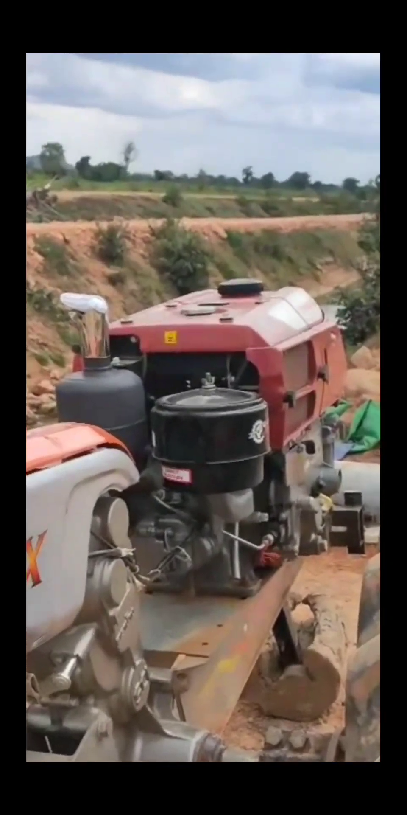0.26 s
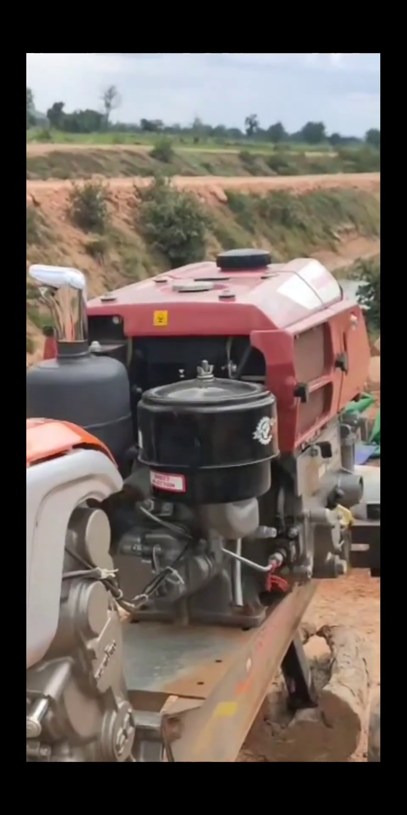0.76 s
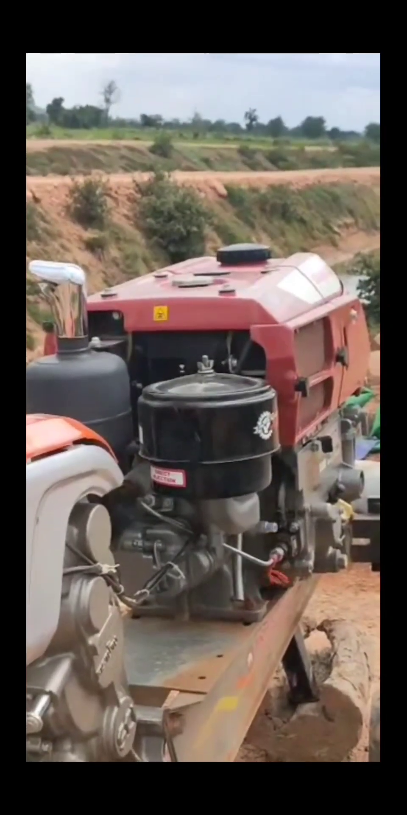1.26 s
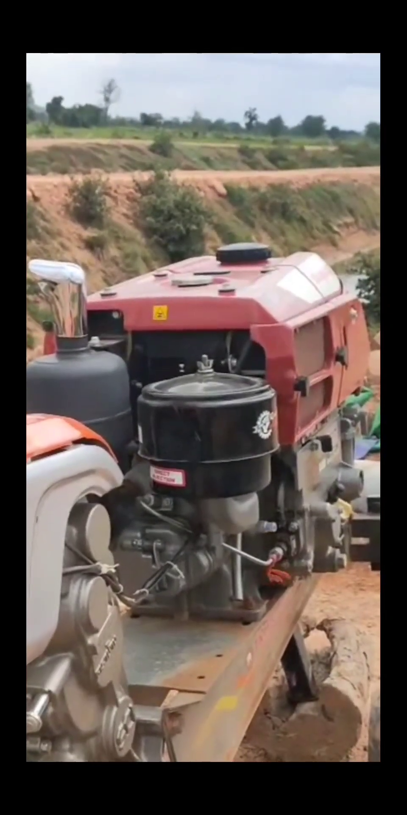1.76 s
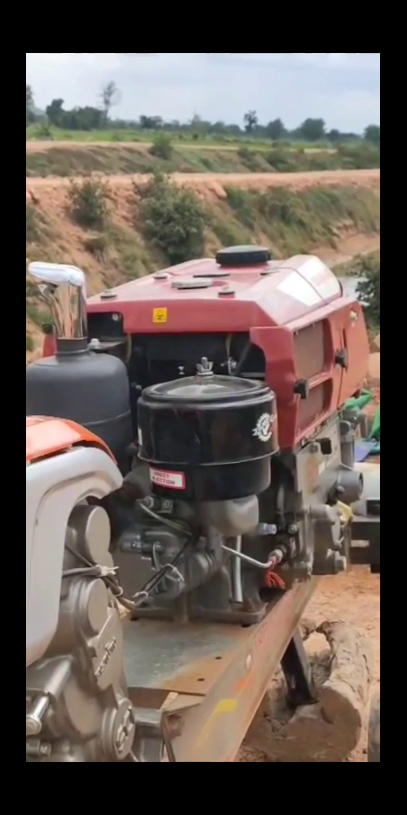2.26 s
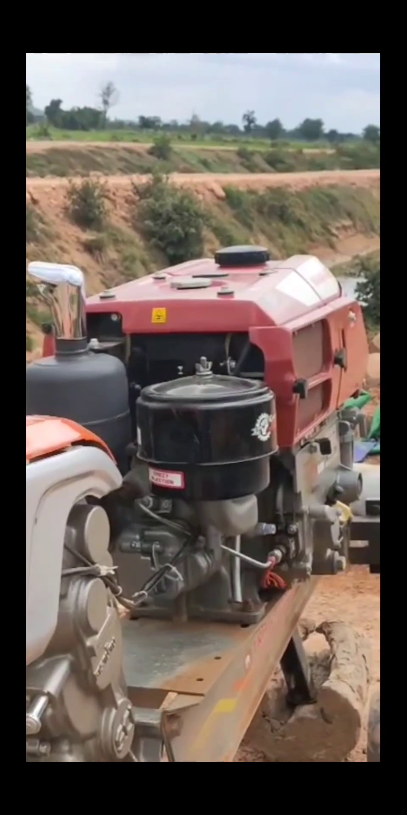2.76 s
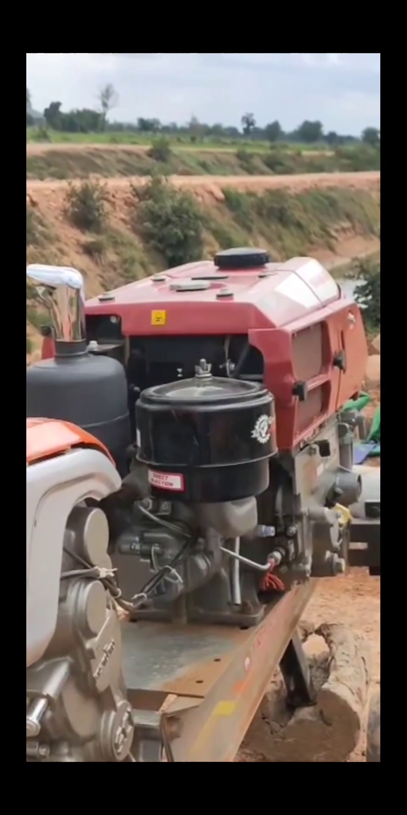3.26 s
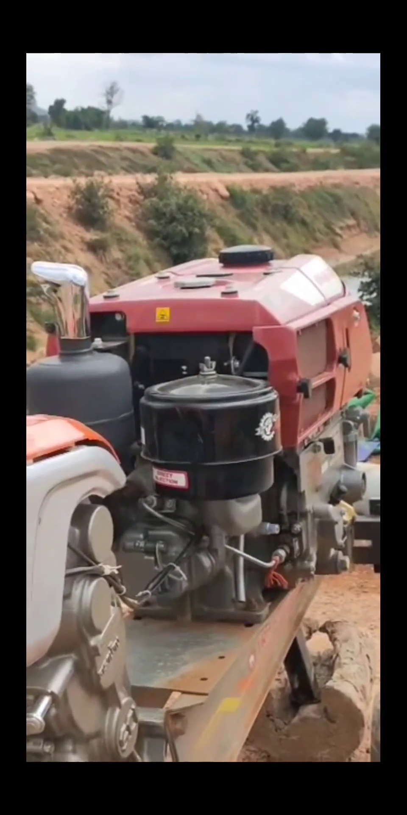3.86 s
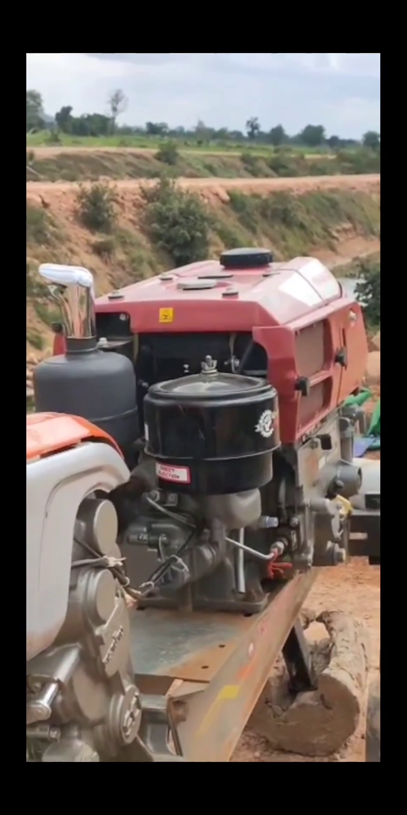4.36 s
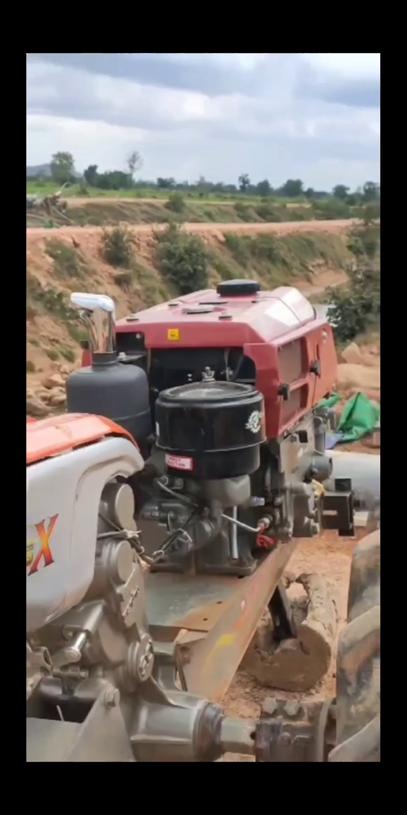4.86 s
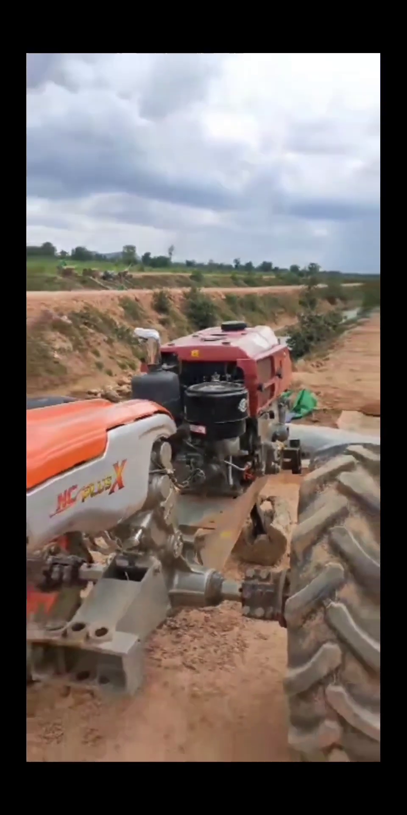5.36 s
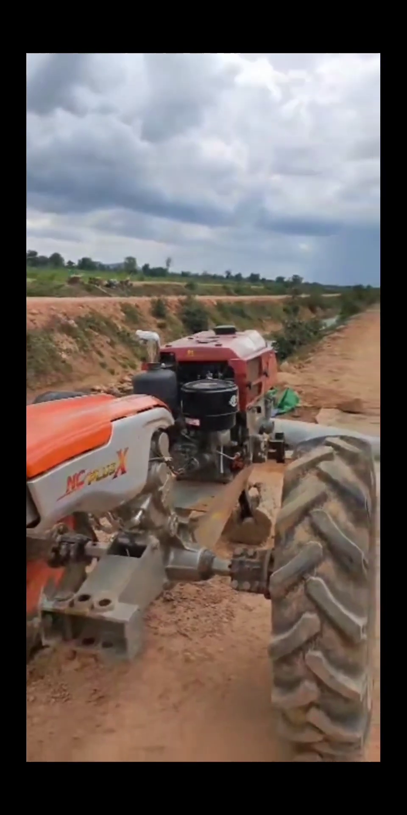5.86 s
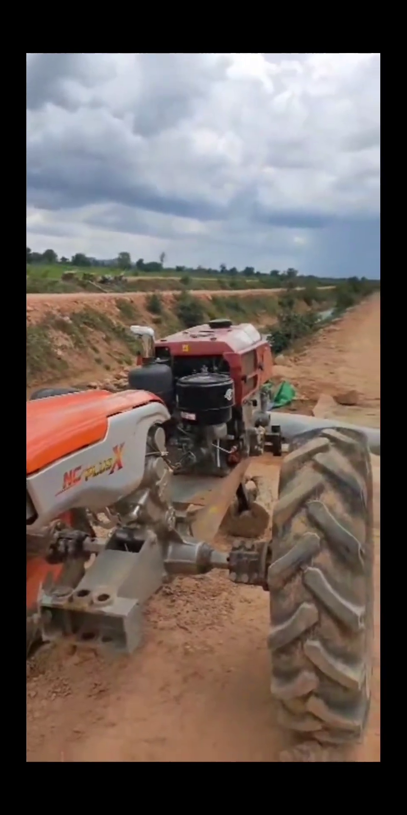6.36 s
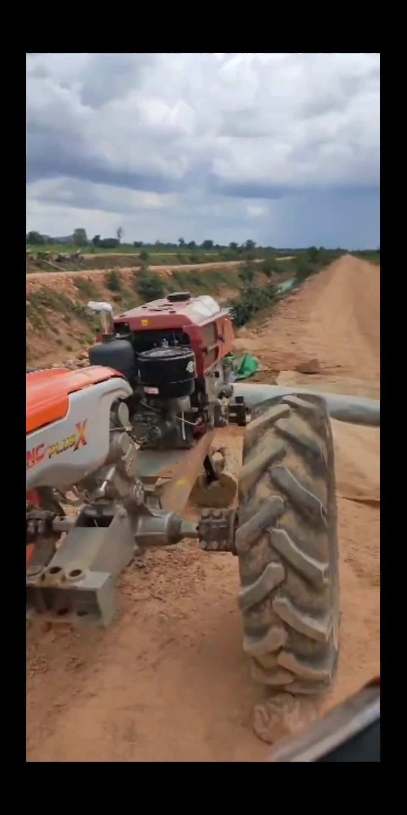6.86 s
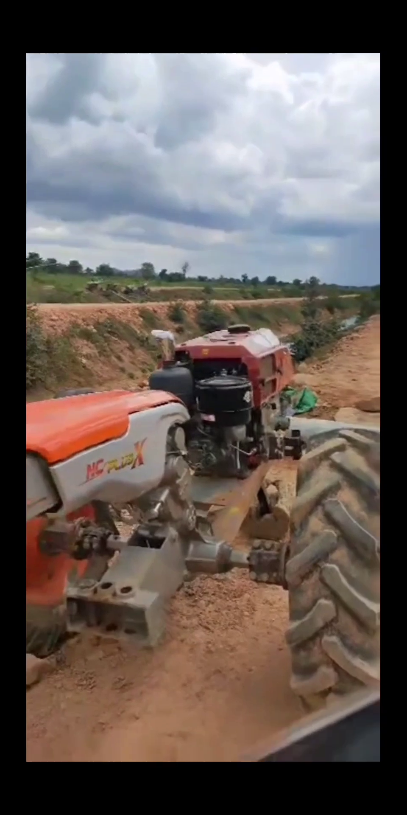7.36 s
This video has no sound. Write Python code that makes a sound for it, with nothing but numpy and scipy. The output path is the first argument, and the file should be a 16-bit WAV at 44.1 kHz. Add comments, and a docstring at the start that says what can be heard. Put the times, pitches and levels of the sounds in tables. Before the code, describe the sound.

Close, rapid chugging of a one-cylinder diesel engine driving a water pump, with rattling metal parts and spitting exhaust.

```python
"""An open field, where a one-cylinder four-stroke diesel drives a water pump, firing about 6.5 times a second.
Each firing knocks the metal block, the piston slaps its wall and the exhaust spits gas. Whirring gears,
ticking valves, the air intake and loose parts fill the gaps. Near the end the microphone is brushed
and partly covered, which makes the sound hollow and a little hissy."""
import sys
import numpy as np
from scipy import signal
from scipy.fft import rfft, irfft
from scipy.io import wavfile
from scipy.ndimage import uniform_filter1d

SR = 44100
rng = np.random.default_rng(int(sys.argv[2]) if len(sys.argv) > 2 else 0)


def transcribe(u):
    """Save the signal u as a 16-bit wav file named by the first command-line argument.

    u: samples, shape (n,) or (channels, n), limited to [-1, 1]; the rate is SR.
    q: integer samples, one column per channel.
    """
    v = np.clip(np.atleast_2d(u).T, -1, 1)
    q = np.round(v * 32767).astype(np.int16)
    wavfile.write(sys.argv[1], SR, q)


N = 335601

# How hard the fuel burns: time_s, level_db
EFFORT = [(0.04, 1.5), (0.19, -1), (0.65, 2.5), (1.12, -0.6), (1.42, 2.5), (1.73, -1.5), (2.19, 1.1),
          (3.11, -2.1), (3.57, 0.8), (3.73, -0.5), (3.88, -0.2), (4.03, -1.7), (4.65, 0.8), (4.8, -3),
          (4.96, 2), (5.42, -0.7), (6.19, 1.3), (7.57, 1.1)]
# Cycles in which the exhaust valve clacks hard, and in which the covers ring out: time_s, level_db
HARD_CLACKS = [(1.46, 6), (2.38, 6), (4.38, 5), (6.38, 4.5), (6.99, 9.5)]
LOUD_COVERS = [(.97, 10), (1.43, 8), (2.35, 7.5), (3.12, 8), (3.43, 10.5), (6.66, 10.5), (7.42, 7)]
# Pushes that follow each firing: delay_s, level_db, brightness_hz
FIRING_KNOCKS = [(.00031, -4, 2280), (.00405, 1.5, 1350), (.00899, 0.7, 563)]
PISTON_SLAPS = [(0.0158, -4.5, 1347), (0.0211, -14, 1720)]
EXHAUST_VALVE_CLACKS = [(0.0402, -19.5, 1067)]
VALVE_KNOCKS = [(.083, -24, 910), (.1, -22.5, 1490), (0.1261, -41, 5000), (0.132, -42.5, 5000)]
ROCKER_TAPS = [(.0005, -1.5, 9100), (.007, 0, 9000), (.0405, 0, 9000), (.086, -4.5, 6070), (.098, -9, 5980),
               (.1258, -7.5, 9080), (.133, -9, 3980)]  # the levers and springs that work the valves
GAS_PUFFS = [(0.034, -4, 402), (0.08, -0.5, 397), (0.123, 0.5, 400)]
# Notes that parts ring with (ring_s is the time to fade by 60 dB): pitch_hz, level_db, ring_s
BLOCK_NOTES = [(246.6, -40.5, 0.19), (282, -37.5, 0.016), (406.1, -38.5, 0.23), (461.3, -26, 0.097),
               (528.6, -28, 0.051), (590, -54, 0.071), (653.3, -34, 0.2), (846.2, -29.5, 0.062),
               (908, -26, 0.055), (984, -34.5, 0.088), (1125.5, -25.5, 0.06), (1214, -18.5, 0.039),
               (1276.5, -19.5, 0.06), (1355, -26, 0.057), (1436, -26, 0.078), (1514.4, -25.5, 0.055),
               (1618, -37, 0.091), (1760, -33, 0.12), (1892, -31, 0.032), (1987, -29, 0.072),
               (2082, -33, 0.057), (2128, -36.5, 0.074), (2242, -33.5, 0.084), (2809, -28.5, 0.055),
               (2957, -32, 0.031), (3102, -34, 0.098)]
COVER_NOTES = [(1850, 1, 0.049), (2892, 1, 0.052), (3027, 2, 0.063), (3124, -5.5, 0.044),
               (3638, -10.5, 0.11), (3860, -24.5, 0.033)]
STEEL_NOTES = [(2163, -47.5, 0.053), (2890, -50.5, 0.027), (3100, -56, 0.025), (3400, -56, 0.031),
               (3960, -59, 0.055), (4520, -63, 0.048), (5840, -72.5, 0.014), (7800, -72, .04),
               (7920, -74, 0.065), (9650, -78.5, .04), (12020, -78, 0.026)]
PIPE_NOTES = [(128, -57, 0.13), (167.4, -48, 0.2), (248.7, -44.5, 0.16), (294, -49, 0.12),
              (433, -55.5, 0.085)]  # air in the silencer and air cleaner
LINK_NOTES = [(2550, -48.5, 0.065), (3880, -51, 0.056), (4010, -44, 0.057), (4800, -59.5, .04),
              (6360, -63, 0.041)]
# Tone of each noise, from low to high: pitch_hz, level_db
WHIRR_TONE = [(30, -37), (95, -32.5), (150, -5.5), (320, -5), (420, 5.5), (640, -6), (740, -6.5),
              (950, -1.5), (1300, -3.5), (2000, -12), (2900, -13.5), (5000, -41), (7600, -43.5),
              (9000, -56.5), (14000, -58)]
RATTLE_TONE = [(30, -31), (110, -26), (240, -10.5), (440, 0), (650, -1.5), (740, -13), (1000, -2),
               (1250, 1), (1550, 2), (1700, -6.5), (2200, -12.5), (3300, -13), (5000, -40.5), (14000, -66)]
SPIT_TONE = [(500, -16), (2500, 4.5), (4000, -2), (5300, -12.5), (7600, -13), (9000, -26), (12500, -27),
             (15000, -37)]
SCRAPE_TONE = [(1500, -2), (3500, 14), (6000, 3), (7500, 5), (9000, -5.5), (12800, -6.5), (14000, -10.5)]
HISS_TONE = [(3000, -21.5), (5500, -7), (7500, 1.5), (8600, -8.5), (11000, -21.5), (14000, -32)]
# Loose washers jingling after each firing: delay_s, spread_s, level_db
JINGLES = [(.008, 0.0061, -34.5), (0.019, 0.0064, -35), (.04, .003, -42.5), (.092, .012, -46.5)]
# A loose link clinking: start_s, level_db
CLINKS = [(0.236, -4), (1.465, 1), (2.543, -5), (3.154, -9), (4.383, -1), (4.538, -12), (4.691, 1.5),
          (4.999, -3), (5.616, 5), (6.995, 4), (7.301, 2)]
# Something brushing the microphone: start_s, level_db, fade_s
SCRAPES = [(6.753, -54, 0.014), (6.777, -58, 0.032), (6.95, -59, 0.019), (7.346, -58, 0.014),
           (7.418, -61, 0.036), (7.489, -58, 0.0026)]
# Covering of the microphone, with amounts from 0 to 1: time_s, hollow_amount, gap_amount
COVERING = [(0, 0.2, 0.04), (5.4, 0.17, 0), (6.2, 0.6, 0.01), (6.72, 0.72, 0.06), (6.8, 0.9, 0.9),
            (7.1, 0.97, 1), (7.61, 0.7, 0.9)]
# How the hollow and the narrow gap change the tone: pitch_hz, gain_db
HOLLOW_TONE = [(300, -0.5), (700, -1.5), (1000, 0.5), (1220, 5.5), (1650, 4), (1900, -8.5), (2400, -8),
               (3100, -4), (4200, -1.5), (7000, -5.5)]
GAP_TONE = [(1500, 0), (2800, 0.5), (4200, 1), (5200, 0.5), (6300, 8.5), (7500, 16), (8600, 11.5),
            (10000, 11), (13000, 3)]

FIRST_FIRING_S, CYCLE_S = .0394, .153665  # one firing every second turn
# The speed control wanders slowly, so the beat runs a little late, then a little early.
DRIFT_S, DRIFT_PERIOD_S, LATEST_AT_S = .0009, 4.8, 1.0
# How each sound follows the effort: level_db, db_per_effort_db, scatter_db
SLAP_RULE, CLACK_RULE = (2.33, 0.65, 1.0), (-2.7, 1.3, 1.4)
COVER_RULE, SPIT_RULE = (1.6, .6, 1.8), (-2.6, .3, 2.1)
# Slap, clack and covers get quieter as the microphone backs away.
BACK_OFF_S = (4.9, 5.05)
FAR_SLAP_DB, FAR_CLACK_DB, FAR_COVER_DB = -4, -3.5, -7
TREBLE_LIMIT_HZ = 14000


def undb(db):
    """Turn decibels into a number to multiply by."""
    return 10 ** (np.asarray(db) / 20)


def colour(x, tone):
    """Make the lows and highs of a sound louder or softer, following a tone table."""
    hz, db = np.transpose(tone)
    size = 2048
    gain = undb(np.interp(np.log(np.fft.rfftfreq(size, 1 / SR) + 1), np.log(hz), db))
    # Shape the filter so that it never answers before the sound arrives.
    cepstrum = irfft(np.log(gain))
    cepstrum[1:size // 2] *= 2
    cepstrum[size // 2 + 1:] = 0
    return signal.oaconvolve(x, irfft(np.exp(rfft(cepstrum))))[:N]


def noise(tone, grain_db=0):
    """Noise of average strength 1; more grain_db makes it grittier."""
    size = SR // 1000
    grains = undb(grain_db * np.clip(rng.standard_normal(N // size + 1), -2, 2))
    loudness = uniform_filter1d(np.repeat(grains, size)[:N], size)
    sound = colour(loudness * rng.standard_normal(N), tone)
    return sound / np.std(sound)


def ring(force, notes):
    """A pushed part rings with fading notes; neighbouring notes swing opposite ways."""
    t = np.arange(SR // 4) / SR
    response = 0
    for k, (hz, db, ring_s) in enumerate(notes):
        fade = np.exp(-np.log(1000) * t / ring_s)
        response += (-1) ** k * undb(db) * fade * np.sin(2 * np.pi * hz * t)
    return signal.oaconvolve(force, response)[:N]


def clicks(times, db):
    """One sharp click at each time."""
    at = np.clip(np.round(times * SR).astype(int), 0, N)
    return np.bincount(at, undb(db) * np.ones(len(at)), N + 1)[:N]


def blows(times, db, pattern, scatter_s, scatter_db):
    """A pattern of pushes in every cycle, never quite alike; soft contacts sound dull."""
    force = 0
    for delay_s, blow_db, brightness_hz in pattern:
        late, strong = rng.standard_normal((len(times), 2)).T
        hits = clicks(times + delay_s + scatter_s * late, db + blow_db + scatter_db * strong)
        softness = np.exp(-2 * np.pi * brightness_hz / SR)
        force += signal.lfilter([1 - softness], [1, -softness], hits)
    return force


def bursts(times, db, rise_s, fade_s):
    """A loudness curve that swells and dies away at each time."""
    t = np.arange(SR // 6) / SR
    shape = (1 - np.exp(-(t / rise_s) ** 2)) * np.exp(-t / fade_s)
    return signal.oaconvolve(clicks(times, db), shape / shape.max())[:N]


def accent(times, db, accents):
    """The cycle nearest to each listed time takes the listed level."""
    db = db.copy()
    for time_s, level_db in accents:
        db[np.argmin(abs(times - time_s))] = level_db
    return db


def firings():
    """Time and strength of every firing, and of the slap, clack, cover ring and spit after it."""
    times = np.arange(FIRST_FIRING_S, N / SR, CYCLE_S)
    times += DRIFT_S * np.cos(2 * np.pi * (times - LATEST_AT_S) / DRIFT_PERIOD_S)
    effort_db = np.interp(times, *np.transpose(EFFORT))
    slap_db, clack_db, cover_db, spit_db = (
        db + follow * effort_db + scatter_db * np.clip(rng.standard_normal(len(times)), -2, 2)
        for db, follow, scatter_db in (SLAP_RULE, CLACK_RULE, COVER_RULE, SPIT_RULE))
    far = np.interp(times, BACK_OFF_S, (0, 1))
    slap_db += far * FAR_SLAP_DB
    clack_db = accent(times, clack_db + far * FAR_CLACK_DB, HARD_CLACKS)
    cover_db = accent(times, cover_db + far * FAR_COVER_DB, LOUD_COVERS)
    return times, effort_db, slap_db, clack_db, cover_db, spit_db


def gear_whirr(times):
    """Gears, belt and pump chatter on, louder as the piston turns at the top between firings."""
    swell = bursts(times + .076, -5 + 4 * rng.standard_normal(len(times)), rise_s=.012, fade_s=.0091)
    return undb(-45) * (1 + swell) * noise(WHIRR_TONE, grain_db=1.5)


def block_knocks(times, knock_db, slap_db, clack_db):
    """Burning fuel, the piston, the opening exhaust valve and the other valve parts all strike the same metal
    block."""
    force = blows(times, knock_db, FIRING_KNOCKS, scatter_s=.00003, scatter_db=0.4)
    force += blows(times, slap_db, PISTON_SLAPS, scatter_s=.00018, scatter_db=0.5)
    force += blows(times, clack_db, EXHAUST_VALVE_CLACKS, scatter_s=.00035, scatter_db=5.5)
    force += blows(times, 0, VALVE_KNOCKS, scatter_s=.00025, scatter_db=2.5)
    return undb(-0.08) * ring(force, BLOCK_NOTES)


def rattle(times, knock_db, slap_db, clack_db):
    """Loose parts chatter after the knock, the slap and the clack."""
    chatter = bursts(times + .00029, knock_db - 28.5, rise_s=.0057, fade_s=.0072)
    chatter += bursts(times + .016, slap_db - 31, rise_s=.0027, fade_s=.013)
    chatter += bursts(times + .0364, clack_db - 34.5, rise_s=.0039, fade_s=.0086)
    return chatter * noise(RATTLE_TONE)


def valve_ticks(times):
    """The steel levers that open the valves tick at the same points in every cycle."""
    return ring(blows(times, 0, ROCKER_TAPS, scatter_s=.00034, scatter_db=3.5), STEEL_NOTES)


def gas_flow(times, spit_db):
    """The exhaust spits as its valve opens, the intake sucks later; the pipes boom with each puff."""
    jet = bursts(times + .034, spit_db - 47, rise_s=.008, fade_s=.007)
    jet += bursts(times + .001, -56 + 2.1 * rng.standard_normal(len(times)), rise_s=.0019, fade_s=.031)
    jet += bursts(times + .087, -62 + 3.4 * rng.standard_normal(len(times)), rise_s=.014, fade_s=.012)
    puffs = blows(times, 0, GAS_PUFFS, scatter_s=.00024, scatter_db=0)
    return jet * noise(SPIT_TONE, grain_db=5) + ring(puffs, PIPE_NOTES)


def cover_ring(times, knock_db, cover_db):
    """Each firing shakes the thin sheet covers, and they sing along."""
    shake = bursts(times + .0075, knock_db - 39.5, rise_s=.0025, fade_s=.0041)
    shake += bursts(times + .012, cover_db - 39, rise_s=.003, fade_s=.0084)
    steady_strength = np.std(ring(rng.standard_normal(N), COVER_NOTES))
    return ring(shake * rng.standard_normal(N), COVER_NOTES) / steady_strength


def washer_jingle(times, low_hz, octaves, fall_db, ring_s, count):
    """Each jolt shakes small parts, each with its own pitch; the smaller, the higher and fainter."""
    sound, t = np.zeros(N + SR), np.arange(SR // 12) / SR
    shape = (1 - np.exp(-t / .0018)) * np.exp(-np.log(1000) * t / ring_s)
    for delay_s, spread_s, db in JINGLES:
        for start_s in np.repeat(times + delay_s, count):
            late, strong = rng.standard_normal(2)
            octave = octaves * rng.random()
            at = max(int((start_s + spread_s * late) * SR), 0)
            gain = undb(db + 3.8 * strong - fall_db * octave)
            sound[at:at + len(t)] += gain * shape * np.sin(2 * np.pi * low_hz * 2 ** octave * t)
    return sound[:N]


def link_clinks():
    """Now and then a loose link bounces and rings."""
    bounces = bursts(*np.transpose(CLINKS), rise_s=.00092, fade_s=.0022) * rng.standard_normal(N)
    return undb(-17) * ring(bounces, LINK_NOTES)


def microphone_scrapes():
    """Something brushes the microphone in short, gritty strokes."""
    rub = sum(bursts(np.array([start_s]), db, fade_s / 2, fade_s) for start_s, db, fade_s in SCRAPES)
    return rub * noise(SCRAPE_TONE, grain_db=4.5)


def scene():
    """The engine, heard from close by with nothing around to echo it."""
    times, knock_db, slap_db, clack_db, cover_db, spit_db = firings()
    engine = gear_whirr(times)
    engine += block_knocks(times, knock_db, slap_db, clack_db)
    engine += rattle(times, knock_db, slap_db, clack_db)
    engine += valve_ticks(times)
    engine += gas_flow(times, spit_db)
    engine += cover_ring(times, knock_db, cover_db)
    engine += washer_jingle(times, low_hz=2201, octaves=2.4, fall_db=16, ring_s=.034, count=4)
    engine += link_clinks()
    return engine[None]


def record(dry):
    """The covered microphone sounds hollow; a narrow gap lifts the treble and hisses; the top is cut."""
    time_s, *amounts = np.transpose(COVERING)
    hollow, gap = (np.interp(np.arange(N) / SR, time_s, amount) for amount in amounts)
    sound = dry[0] + hollow * (colour(dry[0], HOLLOW_TONE) - dry[0])
    hiss = undb(-73) * noise(HISS_TONE)
    sound += gap * (colour(sound, GAP_TONE) - sound + hiss)
    sound += microphone_scrapes()
    treble_cut = signal.ellip(8, .2, 70, TREBLE_LIMIT_HZ, fs=SR, output="sos")
    return signal.sosfilt(treble_cut, sound)[None]


dry = scene()
out = record(dry)
transcribe(out)
```